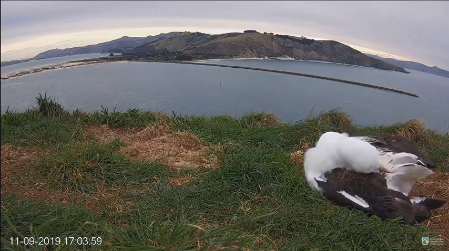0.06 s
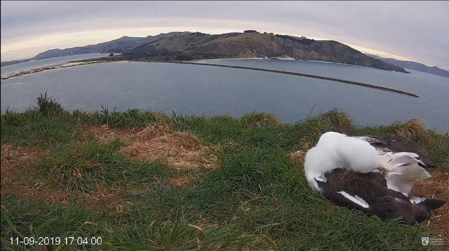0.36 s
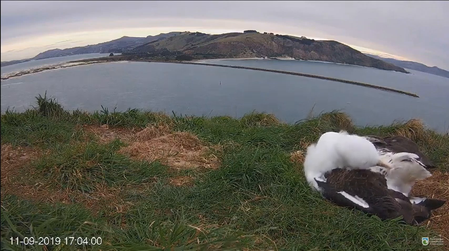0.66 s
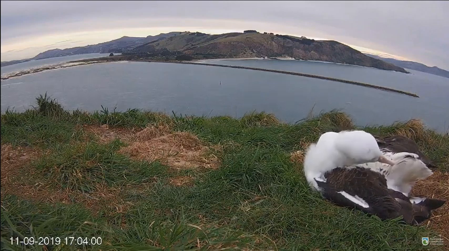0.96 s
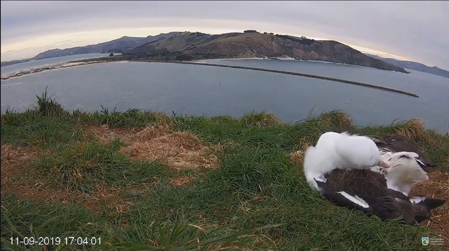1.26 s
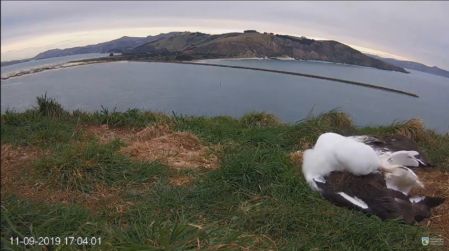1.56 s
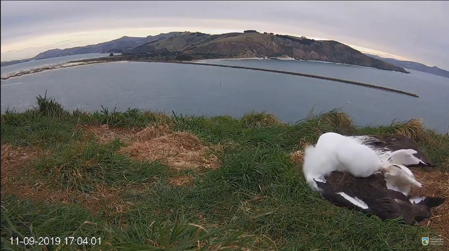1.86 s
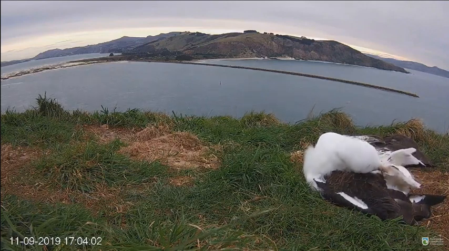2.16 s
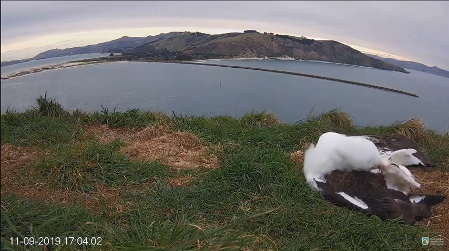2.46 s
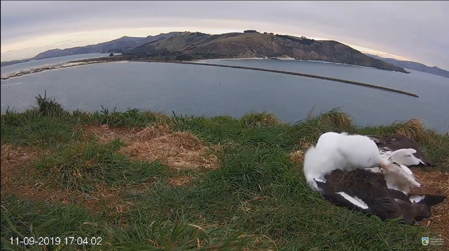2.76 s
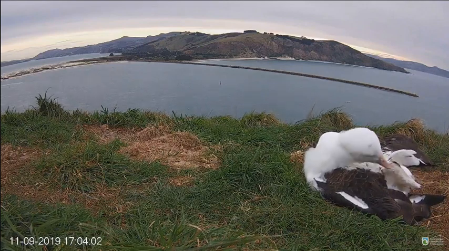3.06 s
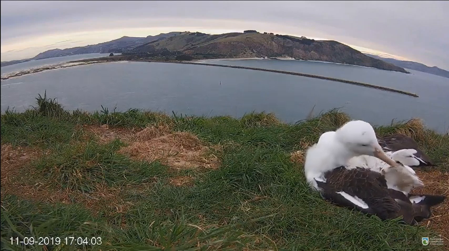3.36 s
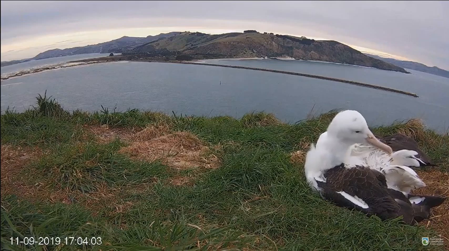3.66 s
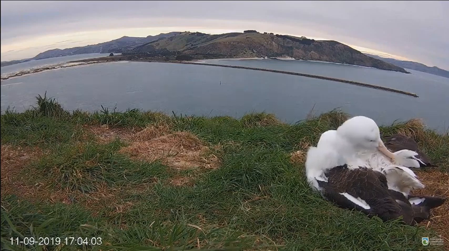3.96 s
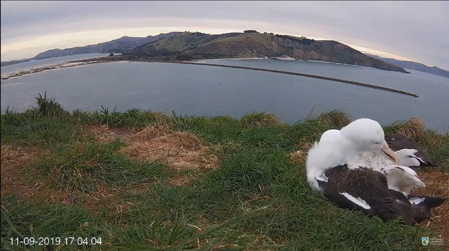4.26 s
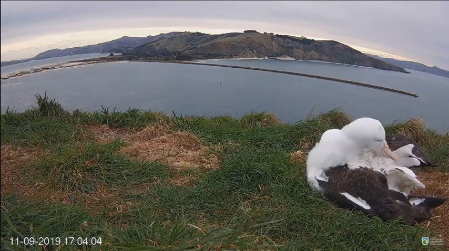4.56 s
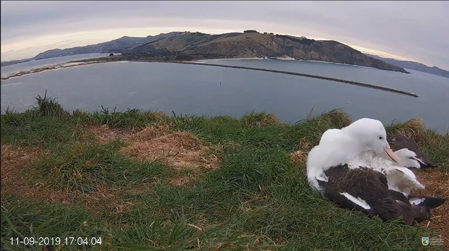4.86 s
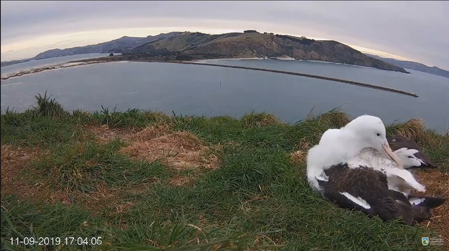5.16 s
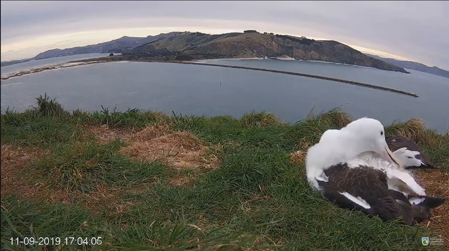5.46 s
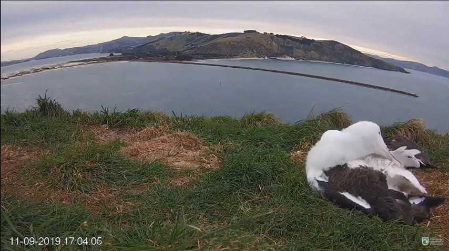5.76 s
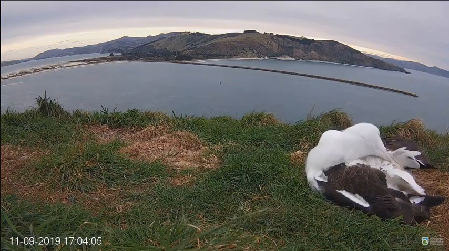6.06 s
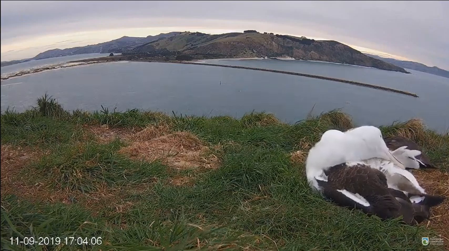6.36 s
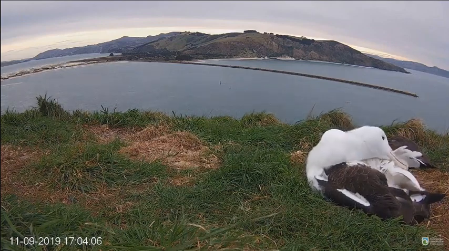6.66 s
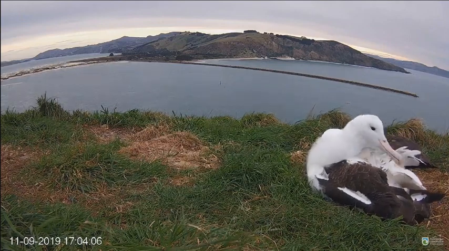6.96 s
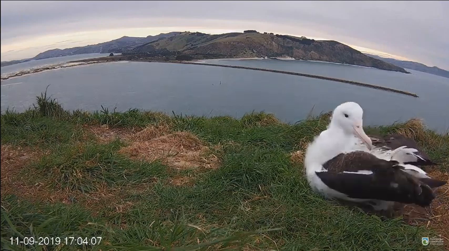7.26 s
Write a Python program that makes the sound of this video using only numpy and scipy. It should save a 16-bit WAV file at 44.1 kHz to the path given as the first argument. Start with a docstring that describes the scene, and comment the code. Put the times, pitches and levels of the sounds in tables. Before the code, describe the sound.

An albatross calls close by on a grassy headland, giving a run of harsh, rattling cries that shift between a rasp and a reedy squeal. The cries come in several phrases with very brief gaps, and grow louder past the middle. Low wind rumbles underneath and picks up a little in the second half, with a faint steady hiss. The outdoor microphone catches almost no echo.

```python
"""An albatross gives a run of harsh, rattling cries on a grassy headland, over a low wind rumble.
Its syrinx chops a reedy tone near 1.1 kHz into short chirps, 50 to 100 times a second.
Pressed notes rasp with a second, lower voice; open notes squeal in clear harmonics.
The bird sounds close, with only a weak tail off the grass, on one narrow-band outdoor microphone."""
import sys
import numpy as np
from scipy import signal
from scipy.fft import rfft, irfft
from scipy.io import wavfile
from scipy.ndimage import uniform_filter1d

SR = 44100
rng = np.random.default_rng(int(sys.argv[2]) if len(sys.argv) > 2 else 0)


def wav_record(signal):
    """Record a signal, one row per channel, as 16-bit PCM in the file named by sys.argv[1]."""
    frames = np.transpose(np.atleast_2d(signal))
    bounded = np.clip(frames, -1, 1)
    # unit amplitude maps onto the largest positive 16-bit level
    quanta = np.round(bounded * 32767).astype(np.int16)
    wavfile.write(sys.argv[1], SR, quanta)


N = 322371
TIME = np.arange(N) / SR


def from_db(db):
    return 10 ** (np.asarray(db) / 20)


def rms_one(x):
    return x / np.sqrt(np.mean(x ** 2) + 1e-20)


def in_time(rows):
    """Each column of a curve table at every sample."""
    times, *columns = np.transpose(rows)
    return [np.interp(TIME, times, column) for column in columns]


def colour(x, points):
    """Causal (minimum-phase) filter through points of f/Hz, gain/dB."""
    size = 2 ** 19
    hz, db = np.transpose(points)
    bin_hz = np.arange(size // 2 + 1) * SR / size
    gain = from_db(np.interp(np.log(bin_hz + 1), np.log(hz), db))
    cepstrum = irfft(np.log(gain))
    cepstrum[1:size // 2] *= 2
    cepstrum[size // 2 + 1:] = 0
    return irfft(rfft(x, size) * np.exp(rfft(cepstrum)))[:N]


def noise(points):
    """Noise of the given spectral shape, rms 1."""
    return rms_one(colour(rng.standard_normal(N), points))


def low_pass(x, hz, order):
    """Low-pass without delay, so that the rest is the matching high-pass."""
    return signal.sosfiltfilt(signal.butter(order, hz, fs=SR, output="sos"), x)


def flutter(hz):
    """Random wavering up to hz, spread 1."""
    smoothing = signal.butter(2, hz, fs=SR, output="sos")
    return rms_one(signal.sosfilt(smoothing, rng.standard_normal(N + SR))[SR:])


def levelled(x):
    """Evens the level over a few chirps, leaving each chirp its shape."""
    power = uniform_filter1d(uniform_filter1d(x * x, size=900), size=700)
    return x / np.sqrt(np.maximum(power, 0) + 1e-12)


def membrane(hz, chirp_start, db_per_octave, harmonics):
    """Reedy tone of a membrane set swinging afresh at the start of each chirp."""
    turns = np.cumsum(hz) / SR
    phase = 2 * np.pi * (turns - turns[chirp_start])
    return sum(from_db(db_per_octave * np.log2(k)) * np.cos(k * phase) for k in range(1, harmonics + 1))


def puff(age, attack, release):
    """Airflow while the syrinx is open (age 0-1): it swells, then dies away."""
    rise = np.clip(age / attack, 0, 1)
    fall = np.clip((1 - age) / release, 0, 1)
    return np.sin(np.pi / 2 * rise) * np.sin(np.pi / 2 * fall) ** 2


# The voice at its source: t/s, chirp rate/Hz, pitch before bending f/Hz, nominal opening/0-1, rasp/0-1
SYRINX_GESTURES = [(0, 58, 1055, .9, .1), (.09, 60, 1000, 0.6, 0.5), (.13, 74, 1090, 0.8, .3),
                   (.2, 79, 1133, 0.84, 0.16), (.3, 67, 1070, 0.7, 0.23), (.38, 61, 975, 0.47, 0.36),
                   (.65, 64, 978, 0.6, 0.33), (.75, 72, 1074, 0.88, 0.4), (.87, 68, 1018, 0.85, .4),
                   (.91, 72, 1226, 1, 0.3), (1.02, 75, 1232, 0.82, .05), (1.06, 72, 1175, 0.88, 0.44),
                   (1.1, 73, 1210, 1, 0.1), (1.17, 66, 1110, 1, 0.35), (1.22, 85, 1105, 0.87, 0.65),
                   (1.29, 98, 1150, 0.95, 0.83), (1.42, 78, 1060, 0.89, 0.7), (1.55, 72, 1022, 1, 0.4),
                   (1.65, 69, 980, 0.7, 0.48), (1.88, 59, 956, 0.64, 0.34), (1.99, 67, 1250, 1, .05),
                   (2.07, 68, 1160, 0.9, 0.3), (2.14, 72, 1345, 0.97, 0.3), (2.18, 66, 1190, 0.96, 0.4),
                   (2.22, 68, 1350, 1, 0.2), (2.28, 68, 1214, 1, 0.2), (2.33, 80, 1250, 1, .3),
                   (2.36, 88, 1130, 1, 0.45), (2.43, 92, 1180, 0.93, 0.6), (2.53, 73, 1085, 1, 0.47),
                   (2.62, 69, 1143, 1, 0.33), (2.73, 59, 997, 0.83, 0.3), (2.85, 49, 903, 0.8, 0.1),
                   (3.07, 68, 1020, .6, 0.65), (3.14, 95, 1120, 0.86, 0.74), (3.23, 81, 1097, 0.8, 0.7),
                   (3.29, 72, 1208, 0.97, 0.32), (3.36, 68, 1170, 1, 0.5), (3.41, 71, 1334, 1, 0.27),
                   (3.46, 69, 1210, 0.88, 0.5), (3.5, 68, 1343, 1, 0.3), (3.56, 65, 1220, 0.96, 0.57),
                   (3.6, 68, 1260, 1, 0.33), (3.66, 69, 1200, 1, 0.48), (3.72, 68, 1219, 1, 0.16),
                   (3.82, 68, 1184, 1, 0.32), (3.92, 61, 1068, 1, 0.18), (4.03, 67, 1098, 1, .15),
                   (4.13, 62, 1038, 0.91, 0.2), (4.25, 48, 920, 0.78, 0.3), (4.43, 68, 1120, .65, 0.26),
                   (4.52, 84, 1196, 0.67, 0), (4.59, 73, 1128, 0.8, 0.13), (4.63, 71, 1192, 1, 0.22),
                   (4.69, 69, 1167, 0.94, .4), (4.74, 75, 1280, .95, .03), (4.8, 67, 1206, 0.88, .3),
                   (4.84, 69, 1247, 0.98, .05), (4.89, 66, 1140, .9, 0.46), (4.93, 67, 1210, .9, 0),
                   (4.99, 62, 1103, 0.95, 0.17), (5.06, 65, 1097, 0.88, .15), (5.14, 58, 994, 0.93, 0.3),
                   (5.21, 52, 882, 1, 0.44), (5.24, 80, 1156, 0.94, .15), (5.3, 86, 1180, 0.64, 0.1),
                   (5.38, 68, 1118, 0.82, 0.22), (5.46, 61, 922, 1, 0.6), (5.64, 62, 950, 1, 0.6),
                   (5.68, 68, 1112, 0.88, 0.1), (5.76, 59, 1006, 0.88, 0.44), (5.83, 63, 1156, 0.88, 0.3),
                   (5.88, 59, 1045, 0.88, 0.34), (5.95, 61, 1133, 0.78, 0.03), (6.08, 57, 1088, 0.77, 0.07),
                   (6.18, 55, 1003, 0.9, 0.3), (6.28, 50, 827, 1, 0.4), (6.32, 102, 817, 1, 0.6),
                   (6.48, 78, 750, 0.83, 0.6), (6.52, 80, 1180, .85, 0.45), (6.57, 82, 1227, .9, 0.26),
                   (6.67, 85, 1233, 0.85, 0.1), (6.72, 85, 1166, 0.83, .4), (6.76, 68, 1074, 0.93, 0.18),
                   (6.86, 60, 1116, 0.85, 0.1), (6.91, 65, 1140, 0.84, 0.08), (6.97, 61, 1092, 0.95, 0.28),
                   (7.03, 69, 1130, 0.96, 0.21), (7.16, 65, 1105, 0.9, 0.14), (7.31, 58, 1034, 0.81, 0.26)]


def syrinx(rate_jitter=.025, pitch_jitter=.008, wobble=.012, shimmer_db=1.1,
           scoop=.24, scoop_share=.13, sag=.1, breath=.36):
    """A slow valve lets out puffs; in each, two membranes chirp, one at the pitch and one well below."""
    rate, pitch, opening, rasp = in_time(SYRINX_GESTURES)
    cycles = np.cumsum(rate * (1 + rate_jitter * flutter(40))) / SR
    chirp = cycles.astype(int)
    chirp_start = np.searchsorted(chirp, chirp)
    detune, strength, length, droop = rng.standard_normal((chirp[-1] + 1, 4))[chirp].T  # per chirp
    open_share = np.clip(opening * (1.112 + .04 * length), .3, 1.05)
    age = np.minimum(cycles % 1 / open_share, 1)
    pitch = pitch * (1 + pitch_jitter * detune + wobble * age * flutter(500))
    # the tone scoops up as pressure builds and sags as it runs out
    bend = 1.02 - scoop * np.exp(-age / scoop_share) - sag * (1 + .5 * droop) * age ** 3
    high = membrane(pitch * bend, chirp_start, db_per_octave=-6.5, harmonics=6)
    # the lower membrane tightens all through the puff
    low = membrane(pitch * (.53 + .17 * age), chirp_start, db_per_octave=-5, harmonics=10)
    flow = puff(age, attack=.18, release=.5 + .27 * rasp) * from_db(shimmer_db * strength)
    return flow * ((1 - rasp) * high + .7 * rasp * low + breath * rng.standard_normal(N))


# Resonances of throat and bill: f/Hz, gain/dB
THROAT_RESPONSE = [(700, -36), (1150, -7), (1600, 4), (2170, 5.5), (2700, 3), (3300, -8), (3700, -5.5),
                   (4150, -9.5), (4600, -14), (5050, -16), (5500, -19.5), (6100, -36), (7500, -54)]
# How hard the bird calls, as heard at the microphone:
# t/s, mid-band level/dB, treble/dB, fundamental before its trim/dB (both relative to the mid band)
CALL_EFFORT = [(0.0, -83.5, 11.5, 7), (0.1, -70, -19, -13), (0.16, -55.5, -6.5, -15),
               (0.289, -55.6, -17.5, -16), (0.319, -66.5, -35, -12), (0.639, -64.5, -33, -13),
               (0.728, -68, 0.5, -10), (0.868, -69.5, 1, -12), (0.918, -55.5, -7, -2), (0.948, -71, -1, -6),
               (1.018, -52.5, -8, -10), (1.068, -64.5, 2.5, -1), (1.107, -52, -4, -9), (1.157, -68, -6, -1),
               (1.197, -53, -9.5, -13), (1.357, -53.5, -4.5, -10.5), (1.487, -56.5, -15, -10.5),
               (1.576, -56, -10, -15), (1.606, -57.5, -31, -9.5), (1.846, -65.5, -35, -11),
               (1.976, -100, -3, -5), (2.005, -67.5, 2, 2), (2.075, -74, 1.5, 4), (2.135, -68.5, 13, -2),
               (2.165, -80, 16.5, 10.5), (2.225, -64, 3.5, 0), (2.295, -63.5, 4.5, 5.5),
               (2.345, -51.5, -6.5, -8.5), (2.434, -49, -0.5, -17), (2.484, -48, -9, -15),
               (2.634, -57.0, -3.5, -4), (2.834, -56, -11, -27), (2.873, -88, 0, 5), (3.053, -97, -14, -2),
               (3.083, -54, -28, -18), (3.103, -50, -13, -25), (3.173, -50.5, -5.5, -23),
               (3.243, -48.5, -13.5, -18), (3.302, -50, -4, -5), (3.372, -54.5, -5, -6),
               (3.412, -44, -7.5, -34), (3.442, -53.5, -0.5, -3), (3.492, -46.5, -3.5, -19),
               (3.562, -54, 0, -2), (3.612, -49.5, -3, -5), (3.662, -51.5, -9, -3),
               (3.702, -49, -1.5, -1.5), (3.861, -51, -6.5, -3.5), (3.971, -46.5, -10, -11),
               (4.2, -48.5, -11, -14.5), (4.22, -51, -15, -21), (4.26, -82, 0, 0), (4.4, -94, -10, 1),
               (4.44, -49, -13.5, -33), (4.5, -41.5, -9, -35), (4.58, -41, -16, -41),
               (4.639, -49, -3, -0.5), (4.709, -57.5, 3, -4), (4.729, -45, 1, -17), (4.759, -47.5, 7, 0),
               (4.789, -55, -1.5, -4), (4.849, -53, 4.5, 5), (4.909, -54.5, -2.5, -10),
               (4.969, -44, -4.5, -9), (5.009, -53, -2.5, -9), (5.049, -42, -8, -21),
               (5.138, -48.5, -5, -14), (5.208, -47.5, -8, -14), (5.268, -40.5, -7.5, -32),
               (5.378, -44, -15.5, -34), (5.458, -59.5, -16, -16), (5.637, -56, -18, -11),
               (5.697, -40.5, -11.5, -22), (5.747, -53.5, -5, -10), (5.837, -46, -8.5, -18),
               (5.897, -55, -2.5, -21), (5.937, -43.5, -8.5, -24), (6.006, -49.5, -2.5, -21),
               (6.056, -42.5, -10, -30), (6.176, -45, -5, -16.5), (6.306, -59.5, -4.5, -9),
               (6.415, -65.5, -4.5, 3.5), (6.485, -67, -28, -1), (6.515, -61, 1, -3),
               (6.775, -41.5, -8.5, -25), (6.874, -49.5, -4, -17), (6.914, -44, -3.5, -26),
               (6.984, -54.5, 4.5, -19), (7.024, -43, -4, -20), (7.094, -53.5, 6, -15),
               (7.134, -44, -4.5, -18.5), (7.308, -44, -8, -24)]


def albatross(fundamental_trim_db=-2.5):
    """The throat colours the chirps; effort sets their level and weighs treble and fundamental."""
    level_db, treble_db, fundamental_db = in_time(CALL_EFFORT)
    voice = colour(syrinx(), THROAT_RESPONSE)
    below_mid = low_pass(voice, hz=1413, order=6)
    below_treble = low_pass(voice, hz=2854, order=6)
    fundamental = from_db(fundamental_db + fundamental_trim_db) * levelled(below_mid)
    mid = levelled(below_treble - below_mid)
    treble = from_db(treble_db) * levelled(voice - below_treble)
    return from_db(level_db) * (fundamental + mid + treble)


def ground_scatter(cries, level_db=-22, decay_s=.023):
    """Grass and ground scatter a brief, weak tail towards the microphone."""
    tail = rng.standard_normal(SR // 10) * np.exp(-TIME[:SR // 10] / decay_s)
    return from_db(level_db) * signal.fftconvolve(cries, tail / np.linalg.norm(tail))[:N]


# Gusts on the headland: t/s, rumble level/dB, rush level before its trim/dB
GUSTS = [(0.0, -52.5, -64), (0.18, -54.5, -63), (0.61, -53, -64), (1.49, -54.5, -62), (1.63, -51, -62.5),
         (1.75, -57, -64), (1.77, -54, -63.5), (2.1, -51, -63), (2.3, -54.5, -62.5), (2.46, -52, -61),
         (3.05, -55, -63.5), (3.09, -52.5, -62.5), (3.97, -50.5, -55.5), (4.25, -49, -57.5),
         (4.42, -53, -58), (4.6, -48.5, -59), (5.13, -50, -55), (5.19, -52, -57.5), (5.39, -49, -54),
         (5.56, -50, -58.5), (6.19, -50.5, -57), (6.51, -48.5, -58), (6.66, -51, -57.5), (6.8, -47.5, -58),
         (7.31, -49.5, -56.5)]
# Spectrum of the buffeting: f/Hz, relative level/dB
RUMBLE_SPECTRUM = [(12, -8), (25, 3), (45, -5), (70, -4), (110, -11.5), (170, -23), (400, -57)]
# Spectrum of the air moving over the slope: f/Hz, relative level/dB
RUSH_SPECTRUM = [(70, -11), (140, 1), (200, -3), (300, -8.5), (450, -10), (600, -14.5), (780, -12),
                 (930, -18), (1300, -15), (2000, -26.5), (4000, -47)]


def wind(rush_trim_db=1.1):
    """Low buffeting and a softer rush over the slope."""
    rumble_db, rush_db = in_time(GUSTS)
    rumble = from_db(rumble_db) * noise(RUMBLE_SPECTRUM)
    rush = from_db(rush_db + rush_trim_db) * noise(RUSH_SPECTRUM)
    return rumble + rush


def hiss(level_db=-76.5):
    """A faint, steady hiss behind the bird and the wind."""
    spectrum = [(500, 6.5), (3000, 12.5), (6000, 1.5), (7700, -21)]  # f/Hz, relative level/dB
    return from_db(level_db) * noise(spectrum)


def scene():
    """The headland from where the microphone stands, in mono."""
    cries = albatross()
    return (cries + ground_scatter(cries) + wind() + hiss())[None]


def record(dry, cutoff_hz=7700):
    """A narrow-band outdoor microphone: the top is cut steeply."""
    return signal.sosfilt(signal.ellip(10, .1, 70, cutoff_hz, fs=SR, output="sos"), dry)


dry = scene()
out = record(dry)
wav_record(out)
```